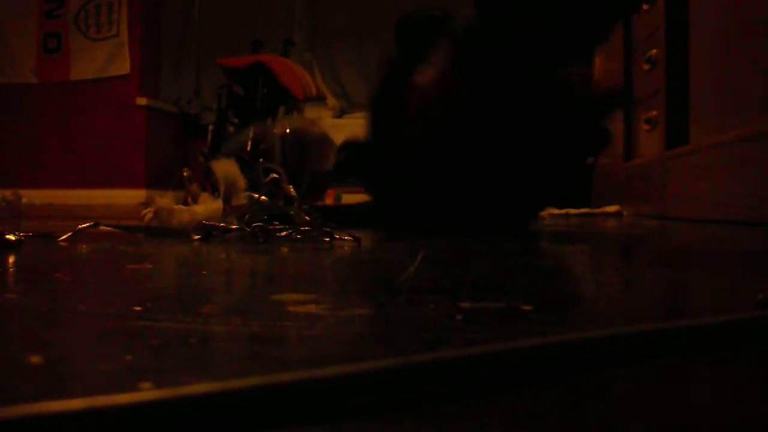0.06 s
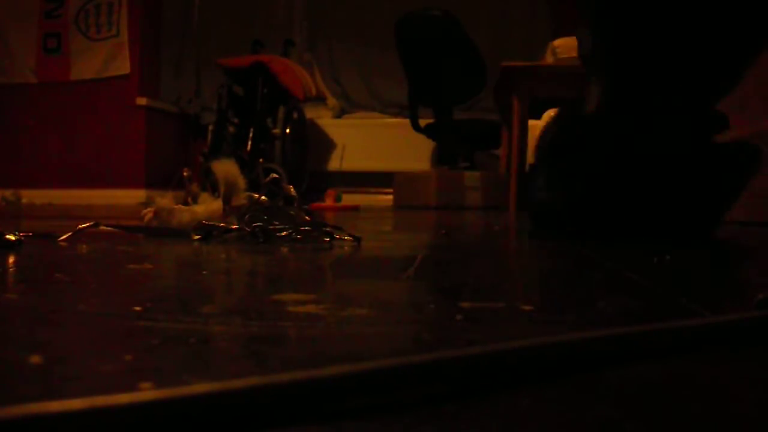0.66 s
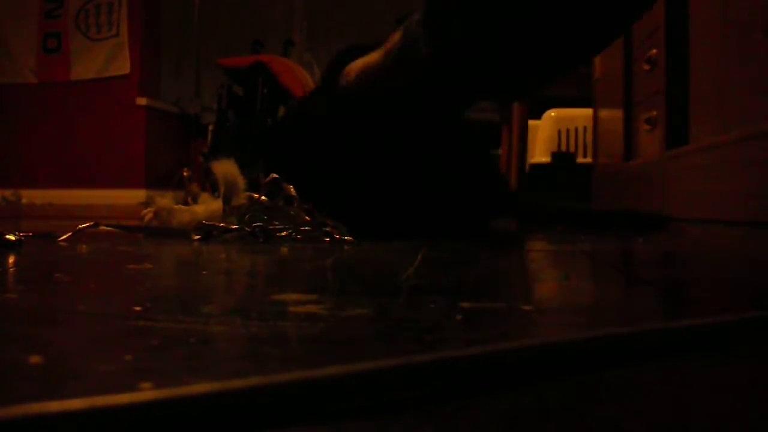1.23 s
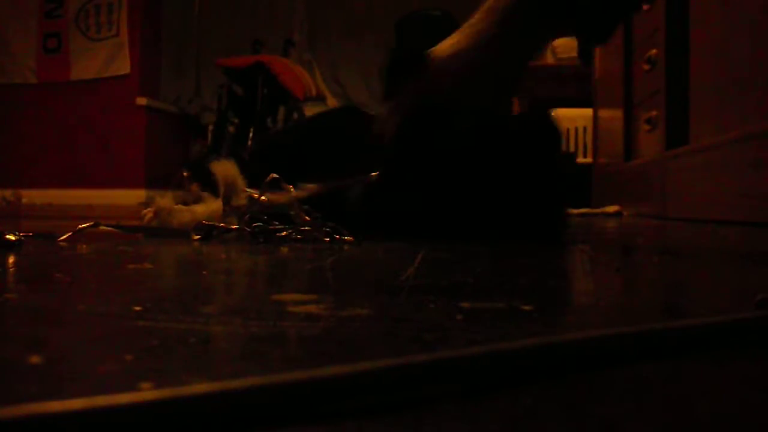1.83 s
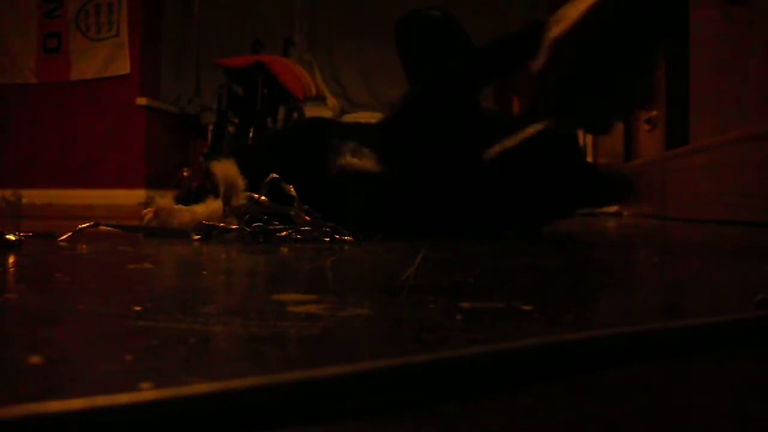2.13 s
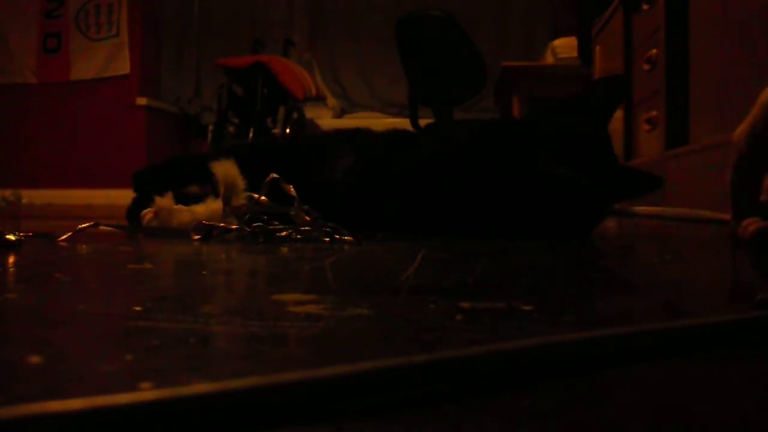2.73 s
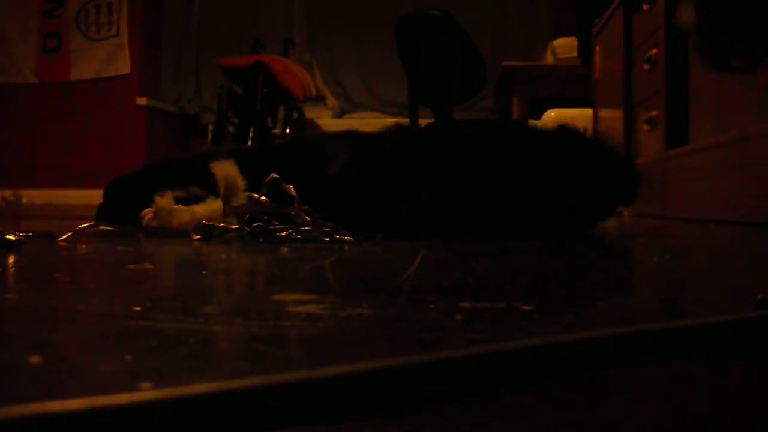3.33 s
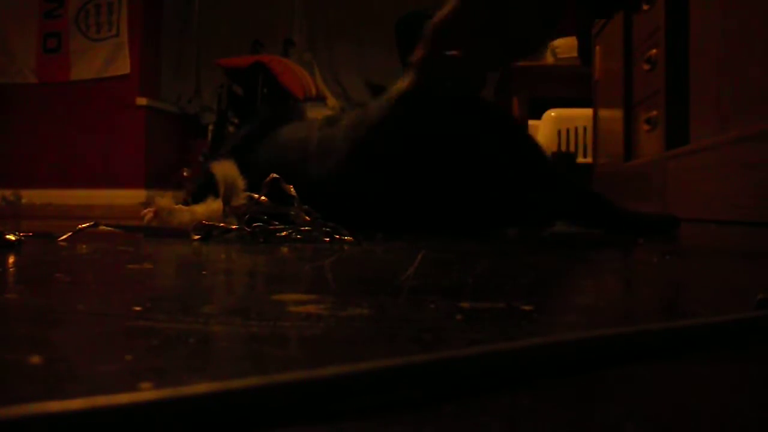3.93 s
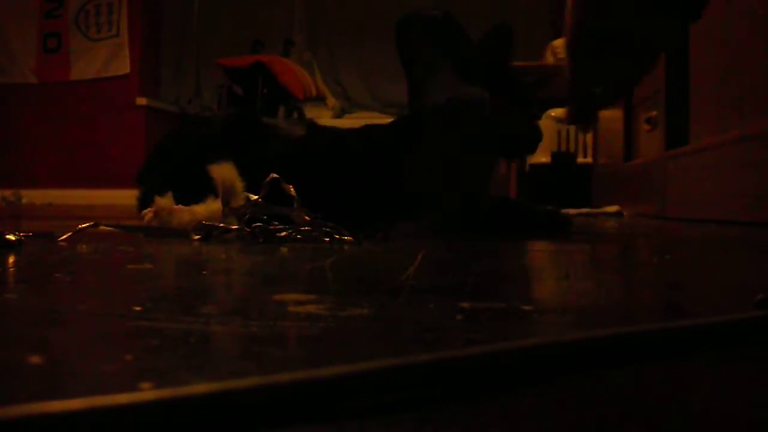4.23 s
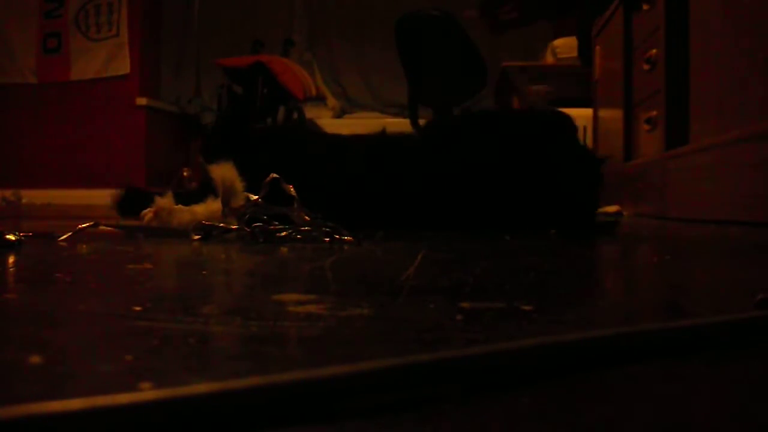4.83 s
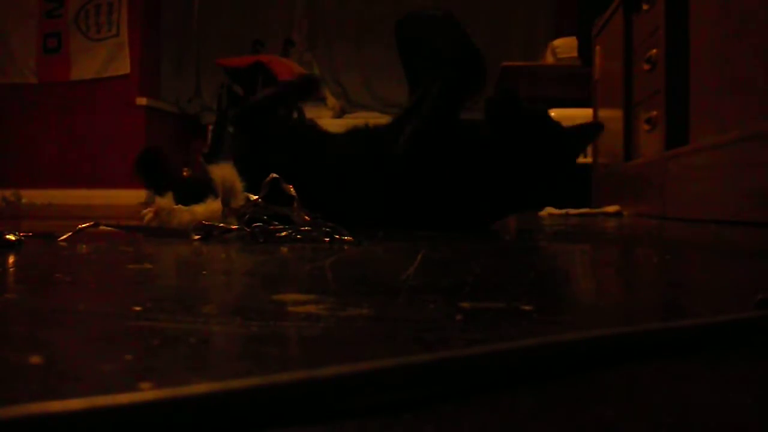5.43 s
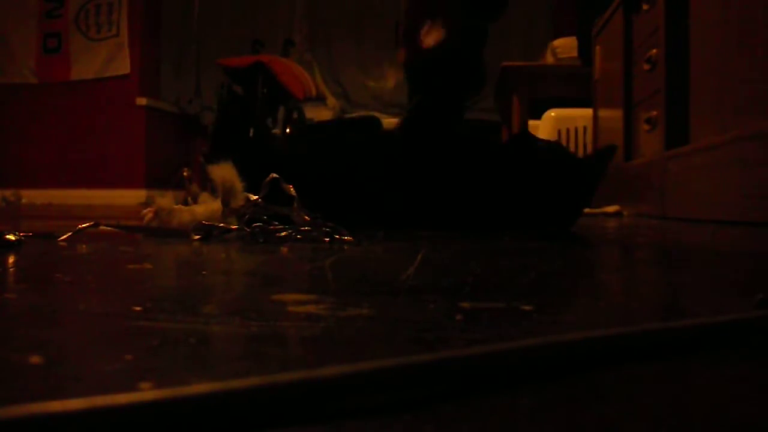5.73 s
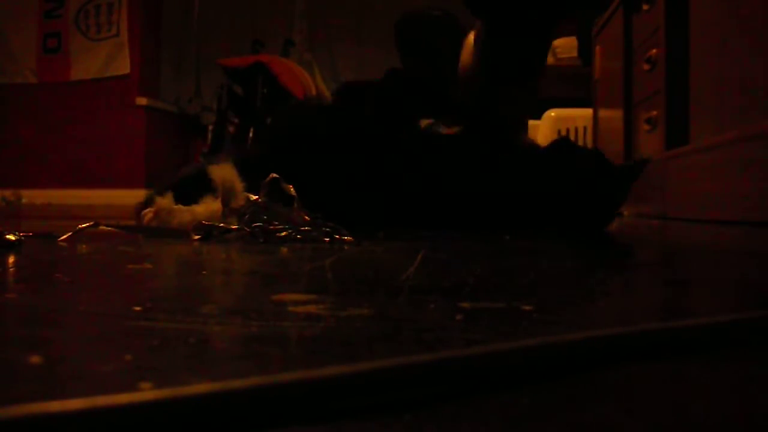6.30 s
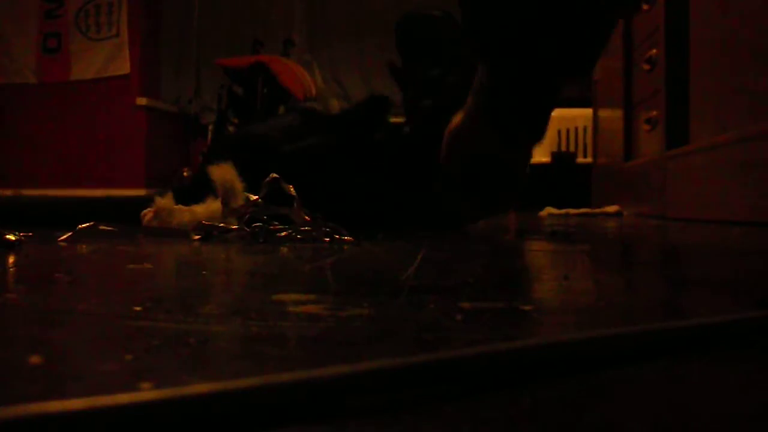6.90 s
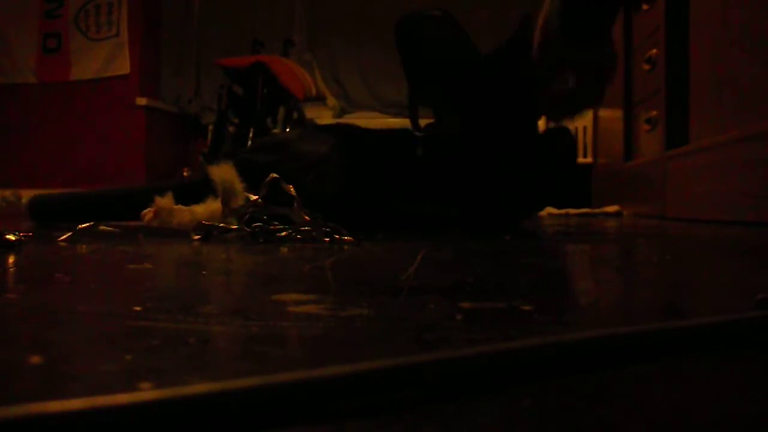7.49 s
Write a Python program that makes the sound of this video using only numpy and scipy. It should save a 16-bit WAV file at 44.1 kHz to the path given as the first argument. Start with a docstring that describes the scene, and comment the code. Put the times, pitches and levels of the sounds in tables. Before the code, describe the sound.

A cat is spun by hand on a wooden floor in a small room. Its fur swishes softly and unevenly over the boards, rolling fine grit. Light claw clicks and paw scuffs grow busier in the middle, with a few soft body bumps. After a short lull, the paws give tiny squeaks and the rubbing resumes. A close microphone on the floor also catches a fan hum, hiss and a faint pulsing whine.

```python
"""A cat is spun by hand on a wooden floor in a small room.
Its fur swishes over the boards and rolls fine grit. Claws and crumbs click, paws scuff and
squeak, and its body bumps softly. The walls add a short echo. Behind it all a fan hums,
and a camera standing on the floor close by adds a faint hiss and a pulsing whine."""
import sys
import numpy as np
from scipy import signal
from scipy.fft import rfft, irfft, next_fast_len
from scipy.io import wavfile
from scipy.ndimage import uniform_filter1d, map_coordinates

SR = 44100
rng = np.random.default_rng(int(sys.argv[2]) if len(sys.argv) > 2 else 0)


def digitize_waveform(pressure):
    """Quantize a signal to 16-bit integers and store it at the path in sys.argv[1].

    Rows of a 2-D input are taken as channels; values are limited to [-1, 1].
    """
    field = np.atleast_2d(pressure).T
    bounded = np.clip(field, -1, 1)
    quanta = np.round(bounded * 32767).astype(np.int16)
    wavfile.write(sys.argv[1], SR, quanta)


N = 332955

# The body slowly turning. Each row: time in seconds, level in dB, share of grit from 0 to 1.
TURNING = [(0, -56.5, 0.2), (.25, -56.5, .1), (.33, -51, 0), (1.05, -49, 0.2), (1.19, -56, .1),
           (1.36, -50.5, 0.04), (1.96, -47.5, 0.4), (2.42, -53.5, .35), (2.7, -53.5, 0.35),
           (3.0, -57.5, 0.2), (3.52, -59.5, 0.1), (3.98, -48.5, 0.3), (4.42, -48, 0.57), (5.47, -60.5, 0.5),
           (5.82, -61.5, 0), (6.12, -53, 0), (6.9, -53.5, 0.33), (7.55, -52, 0.25)]
# Short swishes: fur rubbing the floor, and the room's hissy tail after loud clicks.
# Each row: start in seconds, length in seconds, bright level in dB, dull level in dB.
SWISHES = [(.12, 0.083, -56, -61), (0.332, 0.09, -52, -70), (0.865, 0.058, -51, -69),
           (0.995, .05, -48.5, -62), (1.251, 0.031, -45.5, -57), (1.81, 0.043, -53, -55),
           (1.925, 0.055, -42.5, -63), (2.199, 0.011, -35.5, -52), (2.235, .068, -36, -50.5),
           (2.494, 0.052, -46, -64), (2.738, 0.017, -44, -62), (2.795, 0.085, -44, -51.5),
           (3.06, 0.022, -42, -50), (3.107, 0.15, -45, -57), (3.153, 0.04, -37, -62),
           (3.859, 0.043, -41, -53), (3.966, 0.091, -45, -49), (4.193, .035, -36, -49),
           (4.295, 0.03, -38.5, -47), (4.348, 0.017, -43, -63), (4.456, .06, -42.5, -58),
           (4.518, .03, -37, -51), (4.55, 0.032, -32, -53), (4.793, 0.085, -39, -67),
           (4.974, 0.016, -44, -56), (5.092, 0.079, -42.5, -50), (5.181, .016, -41.5, -58),
           (5.283, 0.043, -39.5, -48), (6.055, 0.099, -53.5, -70), (6.393, 0.26, -56, -56),
           (7.072, 0.17, -49, -67)]
# The flank sweeping the floor in fast turns. Each row: start in seconds, length in seconds, level in dB.
SWEEPS = [(.4, 0.19, -57), (.81, 0.27, -54), (1.295, 0.062, -37.5), (1.46, .3, -55), (7.06, 0.26, -61)]
# Three kinds of brief touch. Each row: start in seconds, level in dB, rise time in seconds.
CLAW_SKIDS = [(2.25, -48, 0.025), (3.17, -47, 0.017), (4.02, -52, .02), (4.555, -57, 0.012),
              (4.823, -39.5, 0.021), (7.08, -55, 0.035)]
PAW_SCUFFS = [(2.812, -39, 0.0032), (3.207, -34, 0.0025), (3.898, -36, 0.0038), (4.1535, -26, 0.007),
              (4.318, -37, 0.0046), (4.553, -39, 0.0093), (5.148, -33, 0.0014), (5.292, -41, 0.003)]
BODY_BUMPS = [(3.198, -46.5, .02), (4.15, -49.5, 0.0091), (4.31, -52, 0.018), (6.320, -43, .005)]
# Claws and crumbs hitting the boards. Each row: start in seconds, relative level in dB, pitch in Hz,
# then the knock, the edge and the snap, each in dB compared with the ring at that pitch.
CLICKS = [(0.5377, -24.5, 4470, -8, -2, -20), (0.6102, -20.5, 5500, -38, -22, -24),
          (1.0852, -29, 4400, -3, -10, -20), (1.6625, -14.5, 4640, -22, -19, -20),
          (2.0369, -18.5, 4260, -10, -18, -22), (2.1017, -19, 4700, -17, -7, -14),
          (2.1266, -16.5, 4770, -14, -4, -30), (2.2045, -22, 4280, -7, -12, -26),
          (2.2157, -18, 5130, -9, 4, -7), (2.2451, -21, 4540, -18, -12, -16),
          (2.2638, -17, 4400, -30, -25, -25), (2.5284, -19.5, 4930, -9, -5, -10),
          (2.751, -16, 4750, -27, -26, -19), (2.8152, -11, 4220, -13, -9.5, -16),
          (2.8719, -21, 4830, -9, -12, -12), (3.1736, -14.5, 4470, -28, -14, -13),
          (3.2097, -19, 4740, -8, -1, -6), (3.5932, -18, 4480, -15, -14, -27),
          (3.6178, -25, 4580, -3, 1, -23), (3.8737, -8, 5060, -35, -19, -7.5),
          (3.881, -11.5, 4200, -20, 0, -9), (3.8967, -12, 4830, -17, -19, -16),
          (3.9032, -6, 4470, -13, -23, -15), (3.9393, -9, 4470, -35, -6, -20),
          (4.0539, -16.5, 4700, -25, -15, -15), (4.079, -20, 4930, -12, -30, 5),
          (4.1331, -20, 4300, -26, -3, -7), (4.1586, -7.5, 4770, -8, -17, -13),
          (4.2941, -17, 4500, -15, -7, -14), (4.3159, -11.5, 4660, -8, 0, -13),
          (4.3218, -12.5, 5040, -17, -18, -26), (4.3273, -19.5, 4400, -4, -14, -27),
          (4.3897, -15, 4340, -14, -5.5, -15), (4.4675, -27, 3180, -2, -9, -13),
          (4.528, -18.5, 4120, -7, -2, -7), (4.5368, -12, 4580, -16, -14, -23),
          (4.556, -5.5, 4600, -20, -19, -29), (4.7159, -21, 4360, -24, -18, -26),
          (4.7821, 2, 4120, -21, -32, -7.5), (4.8204, -2, 4860, -20.5, -0.5, -13),
          (5.1018, -7, 4580, -18.5, -9.5, -21), (5.1106, -20.5, 4230, -6, -9, -11),
          (5.154, -18.5, 4830, -4, -20, -21), (5.185, -19.5, 4690, -18, -14, -14),
          (5.1944, -20, 4750, -12, -8, -30), (5.294, -9.5, 4700, -4, -12, -18),
          (5.3651, -18, 4480, -18, -22, 8), (5.6019, -27, 4710, -22, -9, -12),
          (6.3055, -18.5, 4570, -19, -19, -25), (6.325, -26.5, 3930, -8, -20, -11),
          (6.3938, -20.5, 4840, -20, -14, -14), (6.4384, -23.5, 4380, -18, -10, -7),
          (6.5221, -15, 4800, -12, -16, -23), (6.6704, -14, 5200, -14, -9, -14),
          (6.857, -31, 4300, -3, -14, -14)]
# Paw pads catching on varnish. Each row: start in seconds, level in dB, pitch in Hz, rise in seconds.
SQUEAKS = [(6.401, -38, 2850, .0015), (6.435, -35, 2880, .0022), (6.485, -48, 2850, .008),
           (6.521, -34.5, 2750, .002), (6.584, -42.5, 2780, .004), (6.80, -48, 2850, .003)]
# The boards rumbling under the moving weight. Each row: time in seconds, level in dB.
RUMBLE_LEVELS = [(0, -69), (1.3, -73), (1.8, -61), (3.9, -57.5), (5.2, -58.5), (5.8, -66.5), (7.55, -71)]

# The tone colour of each sound. Each row: frequency in Hz, relative strength in dB.
FUR_COLOUR = [(900, -50), (1800, -24), (2800, -14), (3600, -6), (4500, 0), (5200, -3), (6200, -12),
              (8000, -16), (10300, -17), (12500, -25), (15500, -31)]  # hairs gliding on wood
SCRAPE_COLOUR = [(200, -35), (500, -24), (1000, -6.5), (1600, -3.5), (2200, -1), (3000, 0), (4500, -2.5),
                 (7000, -20.5)]  # the body's weight dragging
SWEEP_COLOUR = [(1300, -36), (1750, -12), (2050, 0.5), (2700, 0), (3700, 6), (4800, 7), (5600, -7),
                (9000, -19), (12000, -40)]  # the whole flank brushing past
SLAP_COLOUR = [(150, -27), (400, -5.5), (750, -0.5), (1150, -17.5), (1600, -2), (2200, -3), (3400, -5),
               (4600, 8.5), (6200, -1), (9500, -10), (12500, -18), (15500, -27)]  # a paw slapping down
KNOCK_COLOUR = [(100, -26), (450, -15), (900, -12), (1400, -6), (2100, 0), (3000, 0), (4500, -10),
                (8000, -45)]  # a board's dull answer to a click
EDGE_COLOUR = [(3000, -30), (5000, -3), (6300, 10.5), (7500, 8.5), (9000, 1), (12000, -40), (16000, -25)]  # a sharp claw on varnish
SNAP_COLOUR = [(3000, -53), (6000, -9), (8000, 4), (9800, 6), (11500, 2), (13500, -5), (16000, -10),
               (18000, -32)]  # the brightest part of a click
THUD_COLOUR = [(40, -28), (100, 0.5), (170, -6), (280, -2), (450, -23), (1000, -37)]  # the soft body landing
RUMBLE_COLOUR = [(20, -30), (38, -4.5), (49, 2), (62, -7), (90, -14.5), (180, -38)]  # boards under load
AIR_COLOUR = [(20, -0.5), (48, -2.5), (66, -6), (130, -6), (240, -2), (330, -7), (650, -9), (1200, -15),
              (2500, -17.5), (6000, -27.5)]  # air rushing from the fan
HISS_COLOUR = [(500, -36), (2000, -17.5), (3200, -3), (4000, -5), (4900, 2.5), (5800, -0.5), (6700, -3.5),
               (8200, -5), (9300, 0), (10200, 7), (11000, -0.5), (12300, -8.5), (14000, -15), (15800, -42)]  # the camera's microphone

# The echo from the walls. Each row: frequency in Hz, seconds it takes to fade by 60 dB.
ECHO_TIMES = [(200, 1), (2000, 0.25), (5000, 0.17), (12000, 0.35)]
# The hum of the fan and mains power. Each row: pitch in Hz, average level in dB.
HUM_TONES = [(49.8, -69.5), (115.5, -69), (170, -78), (203, -76), (226.5, -72), (229.5, -62), (259, -73),
             (294.3, -76), (339.6, -68.5), (343, -65), (392.4, -69.5), (509.8, -75), (575.2, -75.5),
             (679.5, -70), (1056, -75.5)]
# The camera's pulsing whine. Each row: centre in Hz, width in Hz, average level in dB.
WHINE_BANDS = [(3770, 130, -65.5), (7540, 150, -68)]
# The camera's thin steady tones. Each row: pitch in Hz, level in dB.
THIN_TONES = [(3433, -77), (9524, -74)]


def fur(drag_db=-6.5, swish_grit=0.49):
    """Hairs swish, grit crackles and paws scuff; all flutter as the body catches and slips."""
    turning, swishes = np.array(TURNING), np.array(SWISHES)
    glide_db, glide_grit = curve(turning[:, [0, 1]]), curve(turning[:, [0, 2]])
    bright_swish = held_swells(swishes[:, [0, 1, 2]], attack_s=0.0071, fade_db_per_s=337)
    dull_swish = held_swells(swishes[:, [0, 1, 3]], attack_s=0.0071, fade_db_per_s=337)
    level = np.hypot(amp(glide_db), bright_swish)
    swish_share = (bright_swish / level) ** 2
    grit = np.clip(glide_grit + (swish_grit - glide_grit) * swish_share, 0, 1)
    flutter = amp(.6 * wobble(14) + 1.3 * wobble(90))
    glide = level * shifting_colour(rub(FUR_COLOUR, grit), depth_db=1.9)
    drag = np.hypot(amp(glide_db + drag_db), dull_swish) * rub(SCRAPE_COLOUR, grit)
    sweep = held_swells(SWEEPS, attack_s=0.031, fade_db_per_s=69) * noise(SWEEP_COLOUR)
    skids = swells(CLAW_SKIDS) * rub(EDGE_COLOUR, grit)
    scuffs = swells(PAW_SCUFFS) * noise(SLAP_COLOUR)
    return flutter * (glide + drag + sweep + skids + scuffs)


def rub(colour, grit):
    """Rubbing blends the smooth noise of hairs with a share of rolling grit."""
    return np.sqrt(1 - grit) * noise(colour) + np.sqrt(grit) * grains(colour)


def grains(colour, per_second=230, spread_db=5.5):
    """Bits of grit make tiny ticks of uneven size at random times."""
    sizes = amp(spread_db * np.minimum(rng.standard_normal(N), 2)) * rng.choice([-1, 1], N)
    hits = sizes * (rng.random(N) < per_second / SR)
    return unit(signal.fftconvolve(hits, impulse(shape(colour)))[:N])


def shifting_colour(x, depth_db, size=512):
    """The tone colour shifts as other parts of the body touch the floor."""
    bands = signal.stft(x, nperseg=size)[2]
    patches = uniform_filter1d(rng.standard_normal(bands.shape), size=7, axis=0)  # blur over frequency
    patches = uniform_filter1d(patches, size=14, axis=1)  # blur over time
    return unit(signal.istft(bands * amp(depth_db * unit(patches)), nperseg=size)[1][:N])


def clicks(boost_db=8, ring_width_hz=805, chatter_db=-6, board_db=-13, size=1024):
    """A claw or crumb rings briefly, with a sharp edge and snap above and a dull knock below."""
    track, freqs = np.zeros(N), np.fft.rfftfreq(size, 1 / SR)
    for start, db, hz, knock_db, edge_db, snap_db in CLICKS:
        ring = unit((1 + ((freqs - hz) / ring_width_hz) ** 4) ** -.75)
        knock = amp(knock_db) * shape(KNOCK_COLOUR)
        edge = amp(edge_db) * shape(EDGE_COLOUR)
        snap = amp(snap_db) * shape(SNAP_COLOUR)
        contact = impulse(np.linalg.norm([ring, knock, edge, snap], axis=0))
        # the tip chatters for a moment and the board rings on, differently each time
        tail = amp(chatter_db) * burst(fade_s=0.011) + amp(board_db) * burst(fade_s=0.077)
        tail[0] = 1  # the first hit itself
        click = signal.fftconvolve(contact, tail)
        add(track, start, amp(db + boost_db) * click / np.linalg.norm(click))
    return track


def squeaks(waver_radians=0.99):
    """A paw pad sticks and slips for a few milliseconds at a wavering pitch."""
    t, waver = np.arange(N) / SR, waver_radians * wobble(500)
    return sum(swells([(start, db, rise)]) * np.sin(2 * np.pi * hz * t + waver)
               for start, db, hz, rise in SQUEAKS)


def bumps():
    """The soft body meets the floor without ringing, and the boards rumble under it."""
    return swells(BODY_BUMPS) * noise(THUD_COLOUR) + amp(curve(RUMBLE_LEVELS)) * noise(RUMBLE_COLOUR)


def wall_echo(x, delay_s=.006):
    """The walls send the sound back as a short, blurred tail."""
    hz, t, bands = signal.stft(rng.standard_normal(SR // 2), SR, nperseg=256)
    fade = amp(-60 * t / along(ECHO_TIMES, hz)[:, None])
    tail = signal.istft(bands * fade, SR, nperseg=256)[1]
    delayed = np.pad(tail / np.linalg.norm(tail), (round(delay_s * SR), 0))
    return signal.fftconvolve(x, delayed)[:N]


def fan(air_db=-54.5, waver_db=2.0):
    """The fan hums a little unsteadily over the rush of air."""
    t, hum = np.arange(N) / SR, np.zeros(N)
    for hz, db in HUM_TONES:
        level = amp(db + waver_db * wobble(4))
        phase = 2 * np.pi * (hz * t + rng.random()) + wobble(3.024)
        hum += level * np.sin(phase)
    return np.sqrt(2) * hum + amp(air_db) * noise(AIR_COLOUR)


def camera(hiss_db=-52.5, frames_per_second=30):
    """The electronics add hiss, thin steady tones and a whine that swells once per picture."""
    t = np.arange(N) / SR
    pulse = unit((1 + np.cos(2 * np.pi * frames_per_second * t)) ** 2)
    whine = pulse * sum(amp(db) * narrow_noise(hz, width) for hz, width, db in WHINE_BANDS)
    tones = np.sqrt(2) * sum(amp(db) * np.sin(2 * np.pi * hz * t) for hz, db in THIN_TONES)
    return amp(hiss_db) * noise(HISS_COLOUR) + whine + tones


def held_swells(rows, attack_s, fade_db_per_s):
    """A loudness curve in which each swell rises, holds and fades."""
    t, power = np.arange(2 * SR) / SR, np.zeros(N)
    for start, length, db in rows:
        gain = np.minimum(t / attack_s, 1) * amp(db - fade_db_per_s * np.maximum(t - length, 0))
        add(power, start, gain ** 2)
    return np.sqrt(power)


def swells(rows):
    """A loudness curve in which each touch rises to a peak and dies away."""
    t, level = np.arange(N) / SR, np.zeros(N)
    for start, db, rise in rows:
        age = np.maximum(t - start, 0) / rise
        level += amp(db) * age * np.exp(1 - age)
    return level


def amp(db):
    """Turn decibels into a number to multiply by."""
    return 10 ** (np.asarray(db) / 20)


def unit(x):
    """Scale to an average power of 1."""
    return x / np.sqrt(np.mean(x ** 2) + 1e-20)


def along(points, hz):
    """Read between a table's rows, spacing frequencies by octaves."""
    freqs, values = np.transpose(points)
    return np.interp(np.log(hz + 1), np.log(freqs + 1), values)


def curve(rows):
    """Join (seconds, value) rows with straight lines."""
    return np.interp(np.arange(N) / SR, *np.transpose(rows))


def wobble(rate):
    """A smooth curve through `rate` random values a second."""
    return map_coordinates(rng.standard_normal(int(N * rate / SR) + 4), [np.arange(N) * rate / SR])


def filtered(x, response):
    """Turn each frequency up or down by response(hz)."""
    size = next_fast_len(N + SR // 2)
    return irfft(rfft(x, size) * response(np.fft.rfftfreq(size, 1 / SR)), size)[:N]


def noise(colour):
    """Steady noise with this tone colour."""
    return unit(filtered(rng.standard_normal(N), lambda hz: amp(along(colour, hz))))


def narrow_noise(centre, width):
    """Noise gathered around one pitch."""
    return unit(filtered(rng.standard_normal(N), lambda hz: np.exp(-2 * ((hz - centre) / width) ** 2)))


def burst(fade_s):
    """A short puff of noise that falls 60 dB every fade_s seconds."""
    t = np.arange(SR // 20) / SR
    return unit(rng.standard_normal(len(t)) * amp(-60 * t / fade_s)) / np.sqrt(len(t))


def shape(colour, size=1024):
    """A tone colour as gains at evenly spaced frequencies."""
    return unit(amp(along(colour, np.fft.rfftfreq(size, 1 / SR))))


def impulse(gains):
    """One sharp tick with these gains across its frequencies."""
    cepstrum = irfft(np.log(gains + 1e-6))
    half = len(cepstrum) // 2
    # folding the second half onto the first packs the energy at the tick's start
    cepstrum[1:half] *= 2
    cepstrum[half + 1:] = 0
    pulse = irfft(np.exp(rfft(cepstrum)))
    return pulse / np.linalg.norm(pulse)


def add(track, start, x):
    """Mix x into the track, `start` seconds in."""
    part = track[round(start * SR):][:len(x)]
    part += x[:len(part)]


def scene():
    """The cat, its echo and the steady background, the same in both channels."""
    cat = fur() + clicks() + squeaks() + bumps()
    mono = cat + amp(-20) * wall_echo(cat) + fan() + camera()
    return np.array([mono, mono])


def record(dry, top_hz=16000):
    """The camera cuts off the very highest treble."""
    return np.array([filtered(side, lambda hz: 1 / np.sqrt(1 + (hz / top_hz) ** 200)) for side in dry])


dry = scene()
out = record(dry)
digitize_waveform(out)
```